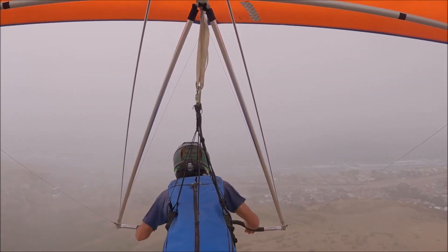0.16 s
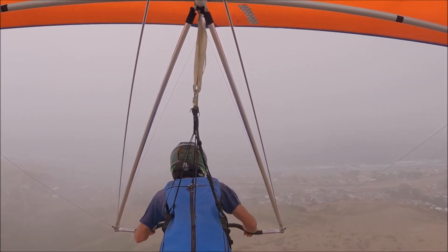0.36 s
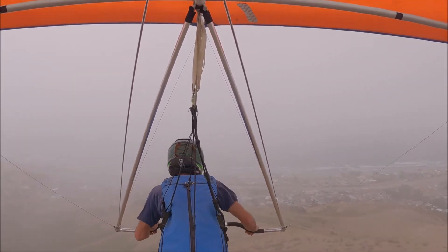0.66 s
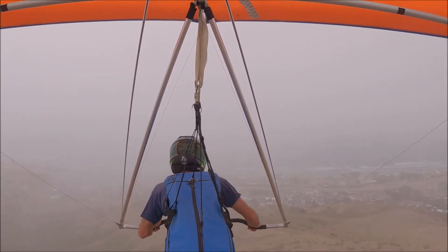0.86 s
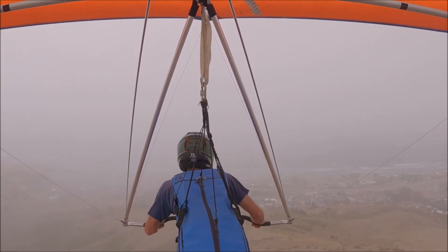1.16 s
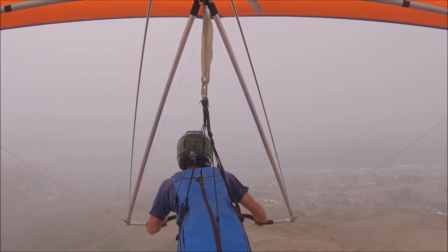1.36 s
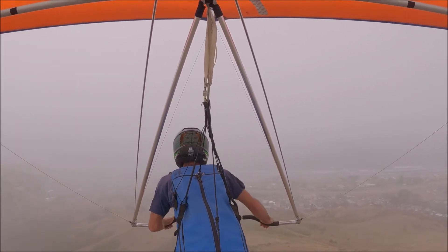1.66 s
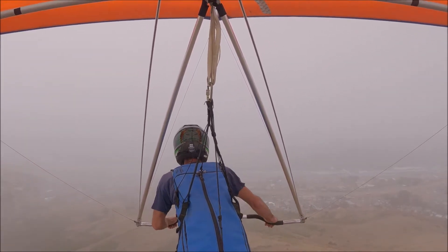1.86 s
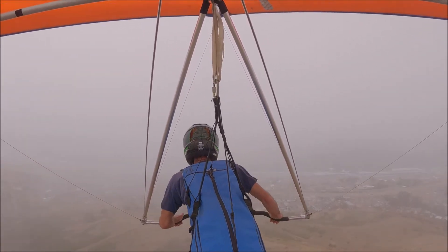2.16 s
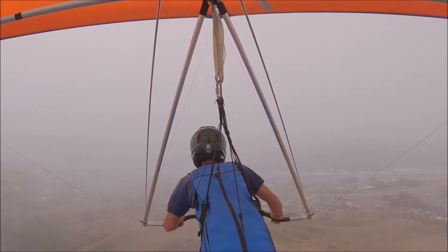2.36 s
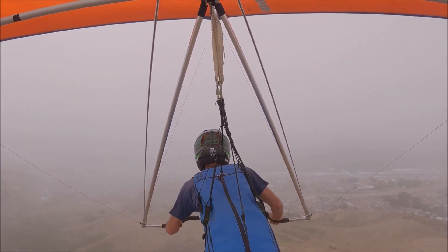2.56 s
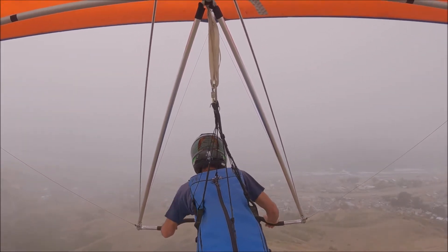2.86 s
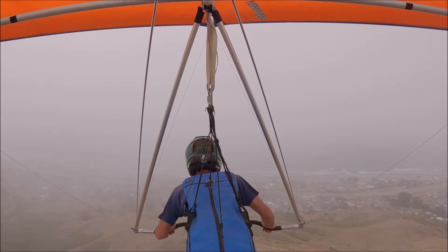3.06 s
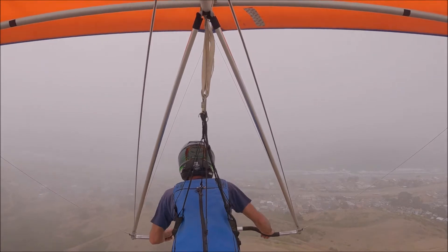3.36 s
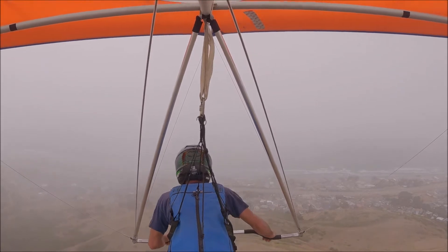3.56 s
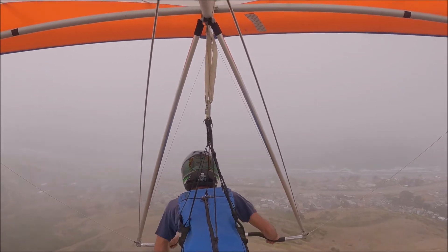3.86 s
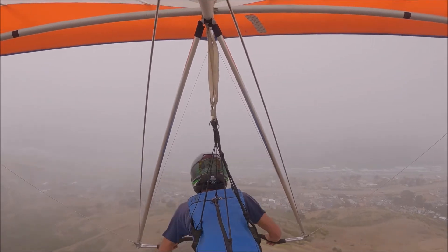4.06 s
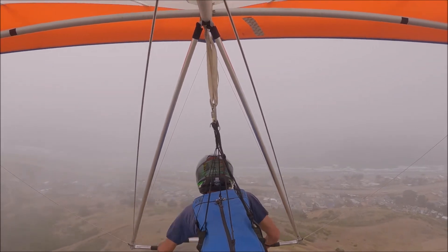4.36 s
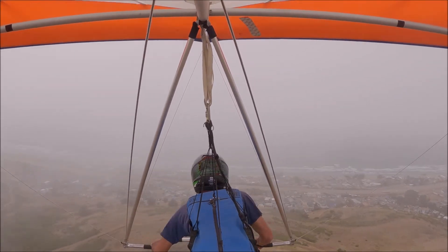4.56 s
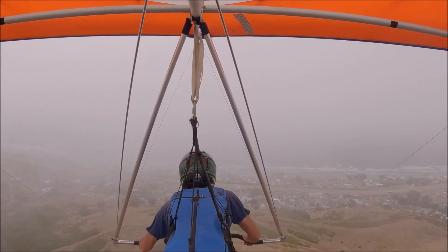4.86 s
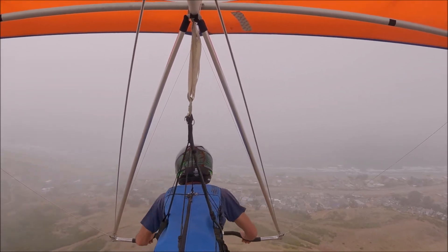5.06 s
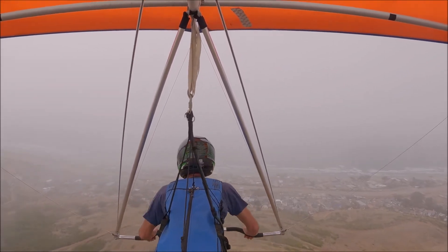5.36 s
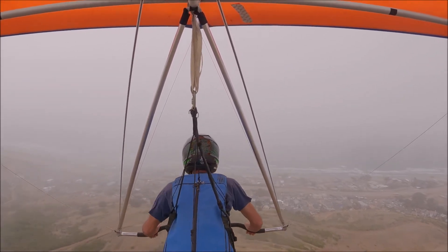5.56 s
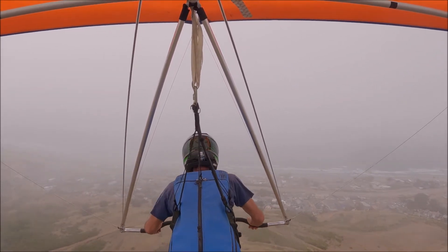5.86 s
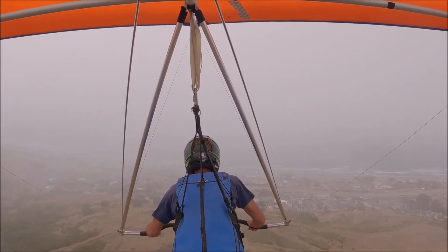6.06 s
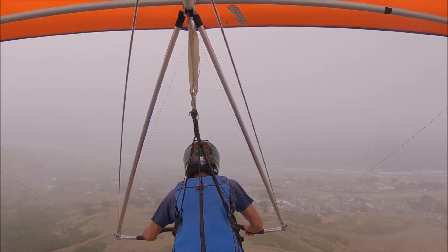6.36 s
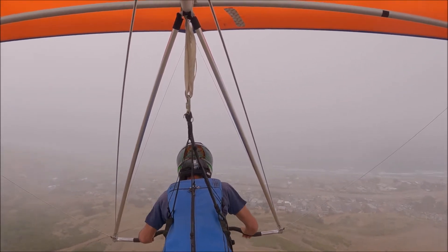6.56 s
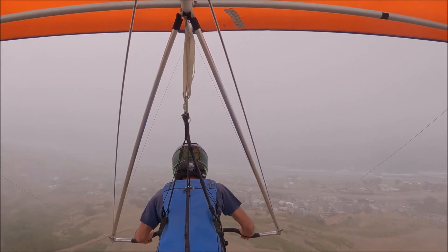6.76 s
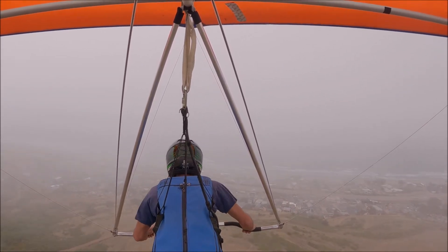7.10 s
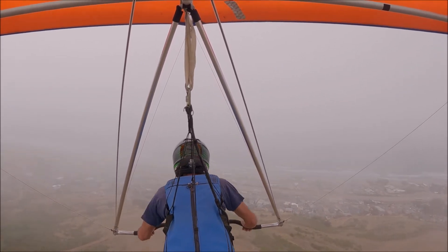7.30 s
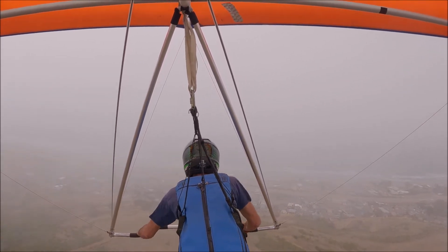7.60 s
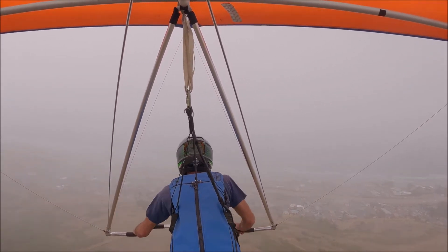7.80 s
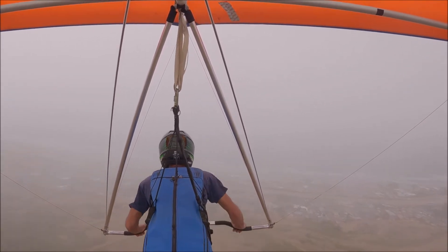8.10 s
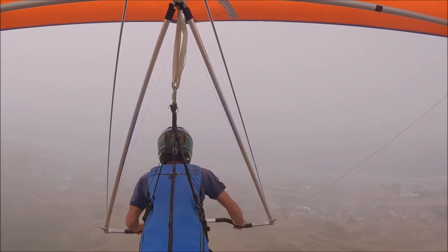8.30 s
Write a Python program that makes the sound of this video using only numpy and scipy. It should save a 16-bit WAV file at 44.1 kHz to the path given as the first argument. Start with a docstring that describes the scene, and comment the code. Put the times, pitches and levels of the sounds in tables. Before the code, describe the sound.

Strong airflow hits a microphone mounted under the wing of a hang glider in open air. A deep, thumping rumble runs from start to finish, with rough gusts fluttering over it and easing only briefly. Short, dull pops and small crackles come irregularly, many each second, as the wind strikes the microphone. A faint hiss and slight rustles, like sail cloth, sit far behind the low rush.

```python
"""Wind on a glider's microphone

A small camera under a glider's wing flies through open air, and turbulence reaches it as pressure swings.
Large eddies thump on the microphone port, smaller ones buffet it in gusts, the sharpest flick past as
short pops, and the air hisses and rustles over the wing. The recorder levels its bass band quickly."""
import sys
import numpy as np
from scipy import signal
from scipy.fft import rfft, irfft, next_fast_len
from scipy.io import wavfile
from scipy.ndimage import uniform_filter1d

SR = 44100
rng = np.random.default_rng(int(sys.argv[2]) if len(sys.argv) > 2 else 0)


def digitize_waveform(pressure):
    """Quantize a signal to 16-bit integers and store it at the path in sys.argv[1].

    Rows of a 2-D input are taken as channels; values are limited to [-1, 1].
    """
    field = np.atleast_2d(pressure).T
    bounded = np.clip(field, -1, 1)
    quanta = np.round(bounded * 32767).astype(np.int16)
    wavfile.write(sys.argv[1], SR, quanta)


N = 372139

# Strength of the turbulence: (time [s], gust level [dB], weight of the deepest eddies [dB])
TURBULENCE = [(0.05, -25, 3), (0.28, -31, -0.5), (0.49, -28.5, 1.5), (0.74, -25.5, -3), (1.2, -27.5, 1),
              (1.5, -26, -1), (1.72, -27, -2), (2.07, -26.5, -6), (2.3, -25, -5.5), (2.61, -25, 3),
              (3.12, -31, -4.5), (3.35, -29.5, -1.5), (3.56, -28, 3.5), (4.14, -25, -8.5), (4.33, -25, 6.5),
              (4.6, -28, -2), (4.93, -26.5, 0), (5.28, -26, 3.5), (5.5, -26, 4.5), (5.7, -25.5, 2.5),
              (5.93, -24.5, 3), (6.15, -25.5, -8.5), (6.51, -23, -2.5), (6.72, -28, -3.5), (6.9, -25.5, 0),
              (7.1, -24, 4.5), (7.3, -25, -0.5), (7.5, -24.5, -1), (7.66, -24, 5.5), (7.96, -28.5, 5.5),
              (8.19, -29, 5), (8.4, -24, -2)]
# The strongest sharp eddies:
# (time [s], knock level [dB], crack level [dB], crack pitch [Hz], half length of the grit [s])
SHARP_EDDIES = [(0.083, -27, -32.5, 1144, 0.0046), (0.1078, -26.5, -47.5, 1216, 0.0051),
                (0.118, -26.5, -45.5, 924, 0.002), (0.26, -29, -36.5, 1604, 0.002),
                (0.3115, -22.5, -31, 1048, 0.0036), (0.457, -29.5, -32, 1090, 0.0044),
                (0.545, -22, -53.5, 1032, 0.0031), (0.6268, -25, -43.5, 1317, 0.0023),
                (0.6888, -23.5, -32.5, 1815, 0.0088), (0.7348, -15.5, -38.5, 803, 0.0019),
                (0.7757, -18.5, -31, 1068, 0.0019), (0.807, -22.5, -42, 1520, 0.003),
                (0.838, -21.5, -36, 2067, 0.0061), (0.876, -21.5, -42, 1325, 0.0058),
                (0.93, -18, -50.5, 902, 0.0055), (1.0041, -14, -28, 953, 0.0029),
                (1.074, -20, -45.5, 1353, 0.0017), (1.1084, -15.5, -40, 1406, 0.0027),
                (1.1664, -30.5, -39.5, 3200, 0.0032), (1.167, -22, -26, 950, 0.0044),
                (1.177, -25.5, -34.5, 1400, 0.005), (1.2131, -21, -40, 1890, 0.0027),
                (1.292, -25.5, -34.5, 1000, 0.0018), (1.3506, -13, -37, 892, 0.0025),
                (1.4045, -17.5, -48.5, 945, 0.0018), (1.4402, -19, -48, 1090, 0.0031),
                (1.5483, -28, -38, 1155, 0.0027), (1.5649, -22, -52, 1713, 0.0072),
                (1.5736, -20.0, -35, 932, 0.011), (1.6056, -17.5, -38, 1110, 0.006),
                (1.72, -21.5, -41.5, 1183, 0.0022), (1.7811, -14.5, -42, 882, 0.0024),
                (1.871, -29.5, -30, 950, 0.0018), (1.9425, -30, -32.5, 1133, 0.0025),
                (1.948, -35.5, -41, 2310, 0.0017), (1.954, -24, -41, 3860, 0.0022),
                (1.957, -8.5, -23.5, 945, 0.0023), (2.0183, -17.5, -43, 1100, 0.0016),
                (2.128, -30.5, -38.5, 2000, 0.002), (2.134, -16.5, -35, 1109, 0.0024),
                (2.1509, -17.5, -38.5, 873, 0.0035), (2.1633, -25.5, -32, 1096, 0.0046),
                (2.172, -29.5, -46, 1073, 0.0047), (2.177, -32, -37, 1290, 0.002),
                (2.2664, -20.5, -36.5, 1518, 0.0023), (2.3068, -25.5, -35.5, 1790, 0.002),
                (2.3127, -23, -32.5, 1096, 0.0032), (2.3375, -16.5, -43, 905, 0.0017),
                (2.3541, -24.5, -48, 1147, 0.0021), (2.4179, -27.5, -36, 1194, 0.0013),
                (2.4739, -22.5, -48, 946, 0.0042), (2.635, -21.5, -45, 930, 0.0016),
                (2.72, -20.5, -35.5, 2404, 0.0025), (2.8413, -21, -39.0, 1370, 0.0046),
                (2.8919, -19, -42, 1077, 0.0057), (2.9323, -25.5, -47.0, 855, 0.0024),
                (2.977, -28.5, -46.5, 920, 0.0041), (3.103, -24, -46, 1515, 0.0039),
                (3.124, -32.5, -27, 782, 0.0018), (3.1241, -35, -42, 2415, 0.002),
                (3.134, -33, -38.5, 1300, 0.0018), (3.194, -35.5, -43.5, 1100, 0.0023),
                (3.2052, -29.5, -33.5, 1018, 0.0021), (3.2164, -35.5, -46.5, 1075, 0.0025),
                (3.227, -38.5, -43.5, 1098, 0.0021), (3.367, -29, -41, 1593, 0.004),
                (3.3774, -22.5, -36, 995, 0.0018), (3.411, -19, -33.5, 1255, 0.0012),
                (3.5702, -20, -36.5, 876, 0.0025), (3.6401, -26, -34.5, 1083, 0.0022),
                (3.655, -30, -38.5, 1607, 0.0076), (3.6846, -30.5, -30.5, 1193, 0.0013),
                (3.711, -23.5, -32, 1213, 0.0013), (3.7604, -23, -53, 1086, 0.0065),
                (3.79, -22, -28.5, 1404, 0.0026), (3.8042, -24.5, -33.5, 903, 0.0019),
                (3.946, -22.5, -56, 840, 0.0038), (3.967, -22, -41.5, 966, 0.0025),
                (4.0264, -25.5, -35, 1178, 0.0038), (4.339, -28.5, -37.5, 855, 0.002),
                (4.348, -28.5, -46.5, 1106, 0.0022), (4.428, -23.5, -34, 1000, 0.0017),
                (4.5145, -15, -32, 1296, 0.0027), (4.642, -29.5, -38, 1300.0, 0.002),
                (4.7128, -24, -40.5, 1840, 0.0028), (4.7386, -37.5, -32.5, 2780, 0.0015),
                (4.739, -16.5, -33.5, 1290, 0.0018), (4.896, -39.5, -39.5, 1420, 0.0018),
                (4.915, -22, -43, 974, 0.0024), (5.0382, -26.5, -30, 1730, 0.0032),
                (5.0701, -22, -44, 1534, 0.0053), (5.0858, -23, -34, 1976, 0.002),
                (5.103, -27, -33.5, 1395, 0.004), (5.1451, -20, -40.5, 1316, 0.0022),
                (5.226, -23, -33.5, 885, 0.0028), (5.2621, -20, -38, 836, 0.0018),
                (5.319, -23, -29.5, 956, 0.0023), (5.3537, -23.5, -36.5, 1096, 0.002),
                (5.3818, -24.5, -34.5, 1198, 0.0022), (5.4132, -17.5, -56, 876, 0.0024),
                (5.5363, -24.5, -57, 1052, 0.00085), (5.618, -16, -35.5, 1081, 0.0023),
                (5.7151, -15, -37.5, 1130, 0.0012), (5.752, -22.5, -36.5, 1197, 0.0022),
                (5.7853, -25, -33.5, 1460, 0.0033), (5.884, -27.5, -37.5, 1904, 0.003),
                (5.892, -18, -38.5, 1165, 0.0026), (5.956, -29, -41.5, 945, 0.0022),
                (5.9803, -24, -45.5, 1597, 0.0055), (6.0216, -23, -35.5, 1597, 0.0029),
                (6.0774, -22, -41, 996, 0.0026), (6.147, -23.5, -46, 1292, 0.0043),
                (6.185, -30.5, -37.5, 1403, 0.002), (6.2046, -22, -30, 841, 0.0019),
                (6.272, -26.5, -45.5, 904, 0.002), (6.4113, -16.5, -39, 1002, 0.006),
                (6.4419, -29, -36.5, 1146, 0.0014), (6.4722, -16.5, -47, 995, 0.0036),
                (6.576, -28.5, -36.0, 1600, 0.002), (6.624, -23, -47, 1230, 0.0033),
                (6.6705, -19, -42, 950.0, 0.0018), (6.802, -24, -54.5, 902, 0.0023),
                (6.873, -32.5, -39.5, 2205, 0.002), (6.921, -34, -43.5, 2310, 0.0016),
                (6.929, -17, -26.5, 1048, 0.0015), (6.9665, -21, -34.5, 1760, 0.0017),
                (7.0873, -25.5, -36.5, 1172, 0.0019), (7.1384, -19.5, -46, 1302, 0.0029),
                (7.1633, -23, -37.5, 1503, 0.0039), (7.2459, -16.5, -32, 806, 0.0015),
                (7.2676, -27, -26, 1052, 0.0022), (7.2805, -34, -28, 888, 0.002),
                (7.287, -34, -36, 1994, 0.0025), (7.4523, -23.5, -33, 1013, 0.0023),
                (7.484, -20, -35.5, 1640, 0.006), (7.5223, -15.5, -36, 1380, 0.0019),
                (7.524, -34.5, -40, 2820, 0.002), (7.5572, -30, -30, 1434, 0.0019),
                (7.8559, -23.5, -50, 1460, 0.0026), (8.0132, -23, -22.5, 950, 0.0018),
                (8.0128, -40.5, -34, 2280, 0.0017), (8.1959, -23.5, -38, 1452, 0.0029),
                (8.271, -24, -54.5, 1154, 0.0084), (8.3009, -14.5, -31, 1633, 0.0026),
                (8.317, -24.5, -32, 1178, 0.0041), (8.3243, -28.5, -33.5, 1485, 0.0033),
                (8.364, -31.5, -36, 1095, 0.0033)]
THUMP_DB = -19.5  # also the level toward which the recorder pulls the bass


def gain_of(db):
    """Amplitude ratio of a level in decibels."""
    return 10 ** (np.asarray(db) / 20)


def unit_rms(x):
    """Normalisation to a root mean square of 1."""
    return x / np.sqrt(np.mean(x ** 2) + 1e-20)


def coloured(x, points):
    """Filtering as a product of spectra, with points of (frequency [Hz], gain [dB])."""
    size = next_fast_len(len(x))
    hz, db = np.transpose(points)
    gain = gain_of(np.interp(np.log(np.fft.rfftfreq(size, 1 / SR) + 1), np.log(hz + 1), db))
    return irfft(rfft(x, size) * gain, size)[:len(x)]


def noise(spectrum):
    """White noise takes on the spectrum of its filter; rms 1."""
    return unit_rms(coloured(rng.standard_normal(N), spectrum))


def wander(lo_hz, hi_hz):
    """Band-limited random modulation of rms 1, stronger at the slow end."""
    return noise([(lo_hz / 2, -60), (lo_hz, 0), (hi_hz, -6), (2 * hi_hz, -60), (4 * hi_hz, -200)])


def curve(table, column):
    """Linear interpolation of one column over time."""
    rows = np.array(table)
    return np.interp(np.arange(N) / SR, rows[:, 0], rows[:, column])


def thump():
    """Large eddies pass slowly, so their pressure is deep noise; its weight shifts between octaves."""
    pressure = noise([(4.7, -30.5), (8.0, -8.5), (30, -1.5), (85, 4.5),
                      (125, 2), (160, -9.5), (210, -31), (350, -120)])
    deepest = coloured(pressure, [(45, -8.5), (75, -57.0)])
    weight_db = curve(TURBULENCE, column=2) + 20 * np.tanh(wander(3.7, 12) / 1.7)
    return gain_of(THUMP_DB) * (pressure + (gain_of(weight_db) - 1) * deepest)


def wake(half_length_s=0.01):
    """Disturbed air surrounds each strong eddy: a Gaussian swell, of height 1 for the hardest knock."""
    times, knock_db = np.array(SHARP_EDDIES)[:, :2].T
    impulses = np.zeros(N)
    impulses[np.round(times * SR).astype(int)] = np.sqrt(gain_of(knock_db - knock_db.max()))
    t = np.arange(-2000, 2001) / SR
    return signal.oaconvolve(impulses, np.exp(-(t / half_length_s) ** 2), "same")


def buffet(flutter):
    """Turbulence is intermittent: smaller eddies come in clumps, and the finer ones clump the most."""
    # Spectrum of the buffeting: (frequency [Hz], gain [dB])
    spectrum = [(82, -90.5), (140, -7), (161, -4.5), (217, -5), (306, -9), (500, -20.5), (832, -32),
                (1500, -42.5), (3000, -60.5), (3900, -68), (6600, -120)]
    coarse = rng.standard_normal(N) * gain_of(1.4 * flutter + 3.2 * wander(28, 60))
    fine = rng.standard_normal(N) * gain_of(2.1 * flutter + 2.4 * wander(28, 200))
    coarse = coloured(unit_rms(coarse), [(250, 2.0), (500, -3.5)])
    fine = coloured(unit_rms(fine), [(200, -5.0), (400, -1.5)])
    level_db = curve(TURBULENCE, column=1) + wander(7.0, 25) + 3 * wake()
    return gain_of(level_db) * unit_rms(coloured(coarse + fine, spectrum))


def hiss(flutter, plain_colour_db=-60):
    """Flow over wing and wires sheds broadband noise that flickers with gusts and brightens as it swells."""
    # Spectrum of the flow noise: (frequency [Hz], gain [dB])
    spectrum = [(900, -26), (1500, 4), (2400, 0), (3000, -1), (3800, -2), (4800, -4), (6200, -11.5),
                (7600, -14.5), (8800, -26.5), (10000, -32.5), (11500, -59)]
    # Strength of the flow noise: (time [s], level [dB])
    levels = [(0.05, -59), (0.26, -63), (1.33, -61.5), (1.91, -63), (2.42, -61), (2.72, -61), (3.1, -63.5),
              (3.37, -64.5), (3.86, -61.5), (4.31, -59.5), (4.58, -60.5), (4.86, -59), (5.37, -63),
              (5.7, -60.5), (6.0, -60), (6.35, -59.5), (6.51, -60.5), (6.68, -61.5), (6.89, -62),
              (7.12, -58.5), (7.3, -60.5), (7.5, -60), (7.77, -60), (7.98, -62.5), (8.19, -61),
              (8.4, -59.5)]
    flow = rng.standard_normal(N) * gain_of(0.18 * flutter + 1.1 * wander(8.7, 44))
    flow = unit_rms(coloured(flow, spectrum))
    level_db = curve(levels, column=1) + 0.87 * wander(3.1, 11)
    treble = coloured(flow, [(4000, -29.0), (6000, 12.0)])
    brightening = gain_of(0.15 * (level_db - plain_colour_db) + 0.26 * wander(6.0, 24)) - 1
    return gain_of(level_db) * (flow + brightening * treble)


def weak_eddies(count=50, spread_db=5.5):
    """Weaker eddies arrive independently, at random times; columns as in SHARP_EDDIES."""
    times = rng.uniform(.05, N / SR - .05, count)
    knock, crack, pitch = np.clip(rng.standard_normal((count, 3)), -2, 1.3).T
    return np.transpose([times, -31 + spread_db * knock, -45.5 + spread_db * crack,
                         1260 * np.exp(0.4 * pitch), np.full(count, 0.0027)])


def pops(puff_db=-14.5, grit_db=-10.5):
    """A sharp eddy passing the port is a pressure transient: a knock in a ragged puff, a gritty crack."""
    # Spectrum of the grit around each crack: (frequency [Hz], gain [dB])
    grit_spectrum = [(500, -26), (900, 10.5), (1400, -1.5), (2200, -8.5), (3500, -20.5), (5500, -29.5),
                     (8000, -47), (10000, -79)]
    # Spectrum of the puff around each knock: (frequency [Hz], gain [dB])
    puff_spectrum = [(200, -28.5), (400, 13), (800, 0), (1500, -26), (3000, -33.5), (5500, -42),
                     (9000, -120)]
    out, t = np.zeros(N), np.arange(-800, 800) / SR
    eddies = np.vstack([SHARP_EDDIES, weak_eddies()])
    draws = rng.random((len(eddies), 2))
    grit, puff = noise(grit_spectrum), noise(puff_spectrum)
    for (time, knock_db, crack_db, crack_hz, ragged_s), (phase, scatter) in zip(eddies, draws):
        near = slice(round(time * SR) - 800, round(time * SR) + 800)
        # The knock's pace loosely follows the crack's pitch.
        pace_hz = 655 * (crack_hz / 1260) ** 0.24 * (1 + .25 * (scatter - .5))
        knock_time = t * pace_hz
        cycles = 0.27 * knock_time + 0.37 * np.tanh(knock_time)  # fastest in the middle
        knock = np.exp(-(knock_time / 0.87) ** 2) * np.cos(2 * np.pi * (cycles + phase))
        knock += gain_of(puff_db) * np.exp(-(t / (1.55 * ragged_s)) ** 2) * puff[near]
        crack_envelope = np.exp(-abs(t * crack_hz / 0.8) ** 1.3)  # pointed, 0.8 cycles to each side
        crack = crack_envelope * np.cos(2 * np.pi * (crack_hz * t + phase))
        crack += gain_of(grit_db) * np.exp(-(t / ragged_s) ** 2) * grit[near]
        out[near] += gain_of(knock_db) * knock + gain_of(crack_db) * crack
    return coloured(out, [(5000, 0), (9000, -24.5)])  # the pops fade above 5 kHz


def rustles(faint_count=24, faint_db=-71, faint_half_s=0.0054):
    """Brief amplitude modulation of the highest hiss sounds like rustling sail cloth."""
    # The stronger swells: (time [s], level [dB], half length [s])
    swells = [(0.65, -61.5, 0.026), (0.703, -63, 0.016), (0.796, -63.5, 0.012), (0.976, -64, 0.01),
              (1.093, -70, 0.0036), (1.17, -65, 0.0072), (2.831, -64, 0.0039), (3.658, -63.5, 0.013),
              (3.803, -60, 0.005), (3.902, -61, 0.0031), (4.87, -54.5, 0.003), (4.915, -69, 0.013),
              (5.126, -66, 0.024), (5.367, -66, 0.0069), (5.89, -64.5, 0.012), (6.988, -63, 0.005),
              (7.04, -65.5, 0.015), (7.15, -66.5, 0.017), (7.294, -66, 0.027), (7.543, -66, 0.03),
              (7.779, -66, 0.01), (7.431, -60, 0.0055), (7.679, -63.5, 0.0088), (8.202, -61, 0.0067)]
    # Spectrum of the rustling: (frequency [Hz], gain [dB])
    spectrum = [(3000, -28.5), (4500, 5), (7500, -7.5), (9500, -20), (11000, -56.5)]
    t, envelope = np.arange(N) / SR, np.zeros(N)
    faint_swells = [(0.072 + (N / SR - .2) * when, faint_db + 6.0 * (size - .5), faint_half_s)
                    for when, size in rng.random((faint_count, 2))]
    for time, level_db, half_s in swells + faint_swells:
        near = slice(round((time - .05) * SR), round((time + .05) * SR))
        envelope[near] += gain_of(level_db) * np.exp(-((t[near] - time) / half_s) ** 2)
    return envelope * noise(spectrum)


def scene():
    """Superposition: the pressures of all the moving air add at one microphone port."""
    flutter = 1.57 * np.tanh(wander(9.7, 35.0) / 0.89)  # bounded clumping, common to buffet and hiss
    return (thump() + buffet(flutter) + hiss(flutter) + pops() + rustles())[None]


def record(dry, bass_hz=168, cutoff_hz=15700):
    """Fast compression evens out the bass band; soft saturation and a low-pass filter follow."""
    bass = coloured(dry[0], [(0.9 * bass_hz, 0), (0.72 * bass_hz, -40)])
    power = uniform_filter1d(uniform_filter1d(bass ** 2, 700), 500)
    excess_db = 10 * np.log10(abs(power) + 1e-9) - THUMP_DB
    bass_gain = gain_of(-.7 * np.maximum(excess_db, -9))  # cuts loud bass, lifts quiet bass
    levelled = dry + bass * (bass_gain - 1)
    saturated = 0.86 * np.tanh(levelled / 0.67)
    low_pass = signal.firwin(511, cutoff_hz, window=("kaiser", 9), fs=SR)
    return signal.oaconvolve(saturated, low_pass[None], "same")


dry = scene()
out = record(dry)
digitize_waveform(out)
```